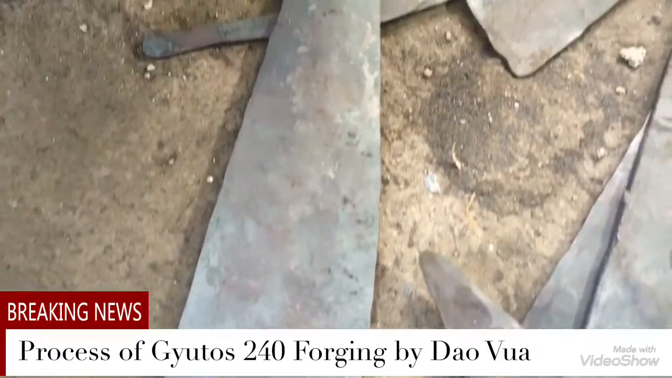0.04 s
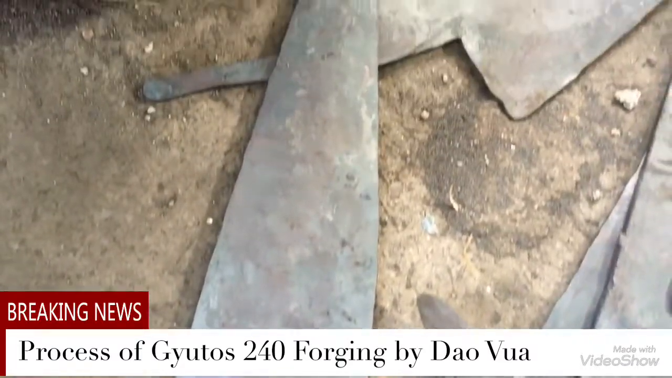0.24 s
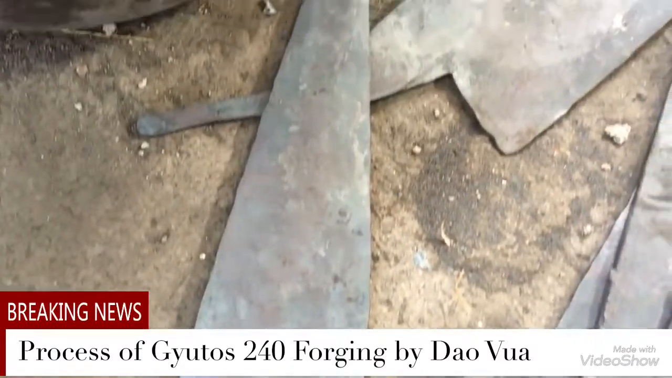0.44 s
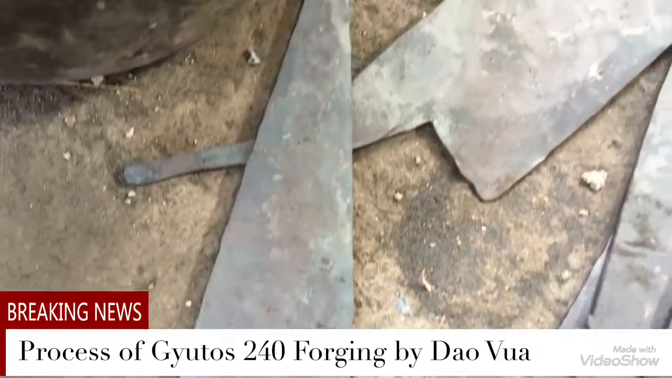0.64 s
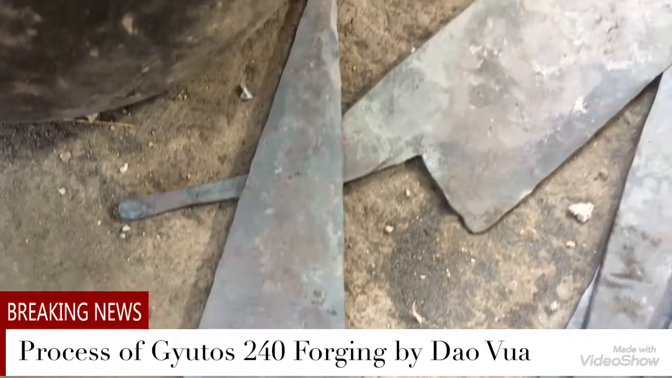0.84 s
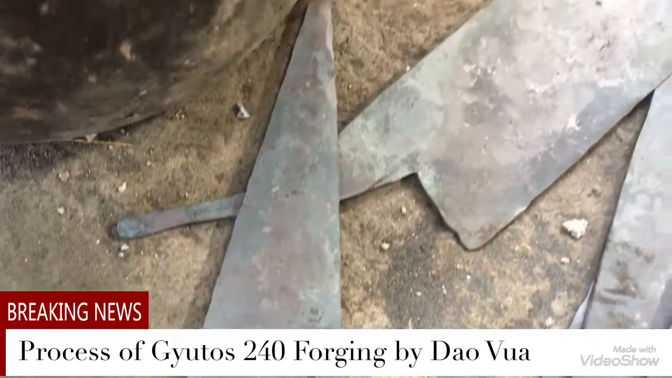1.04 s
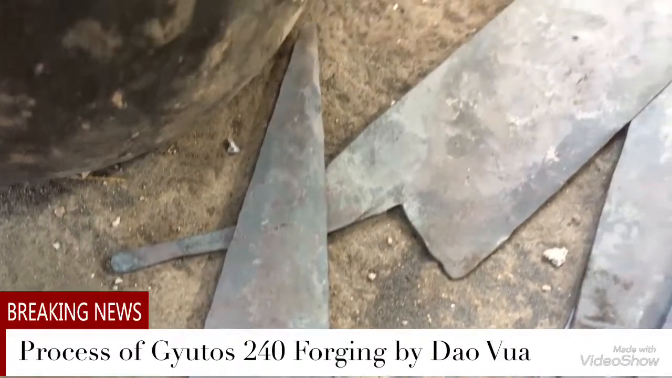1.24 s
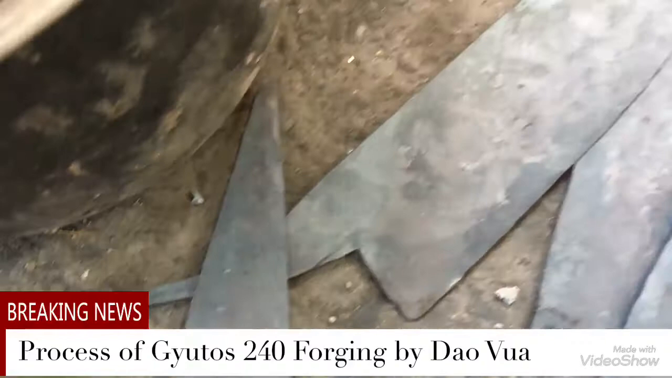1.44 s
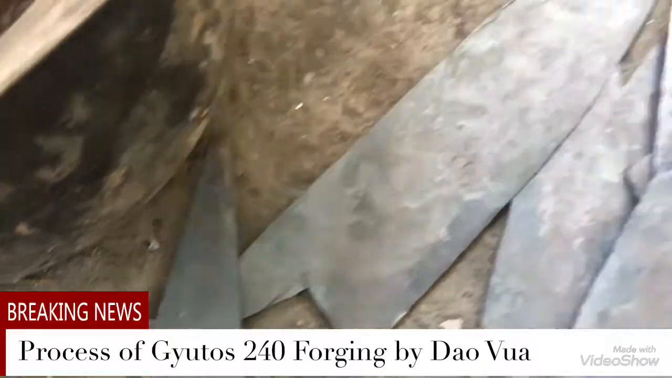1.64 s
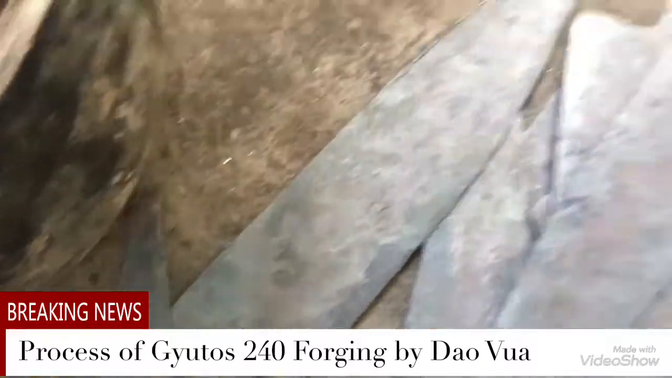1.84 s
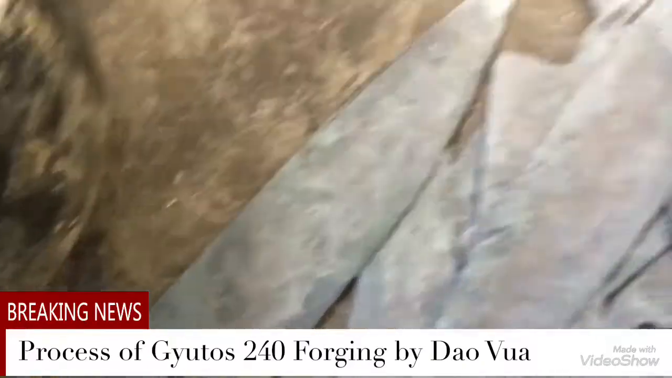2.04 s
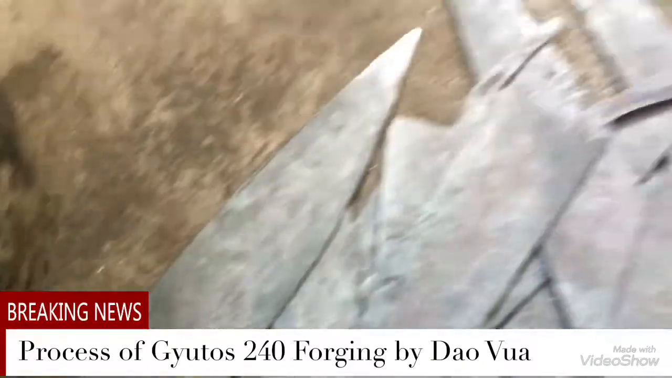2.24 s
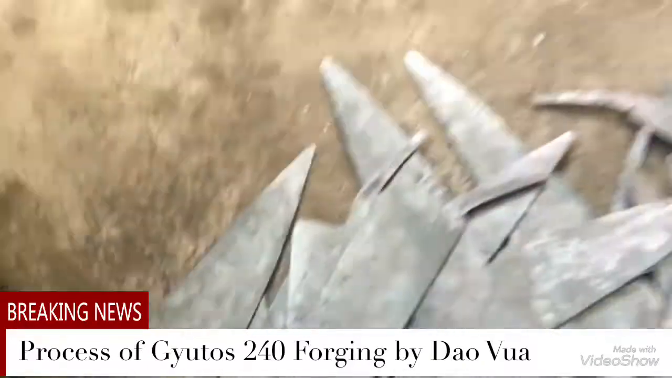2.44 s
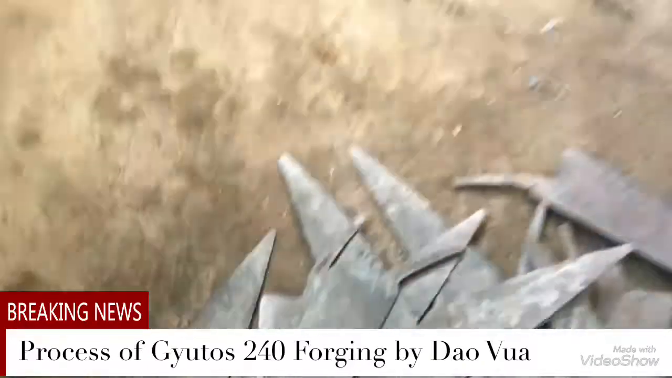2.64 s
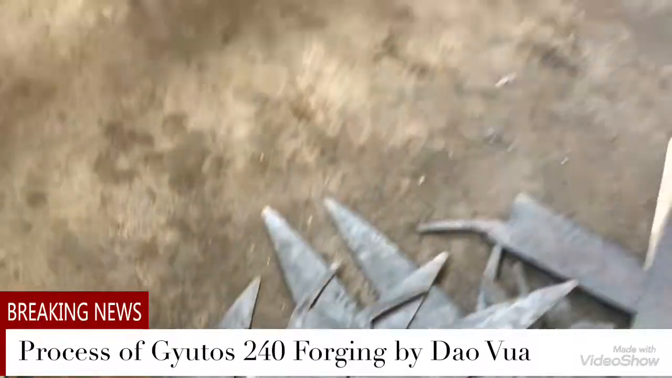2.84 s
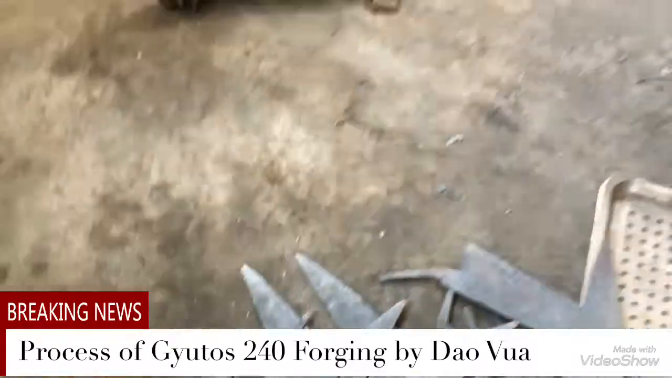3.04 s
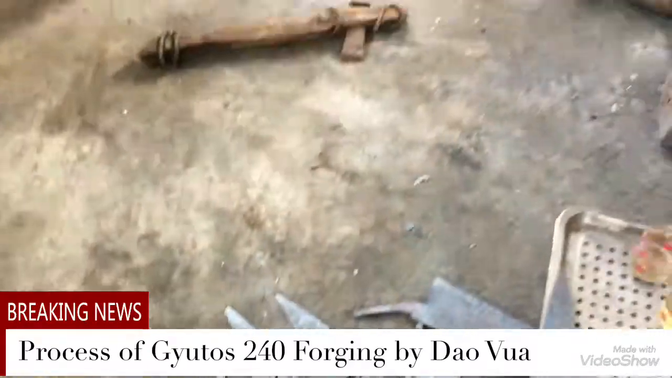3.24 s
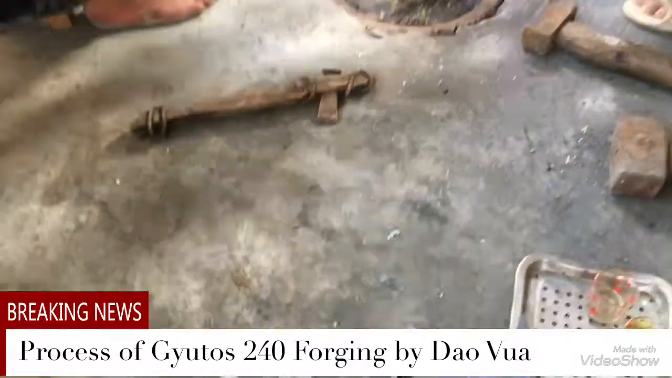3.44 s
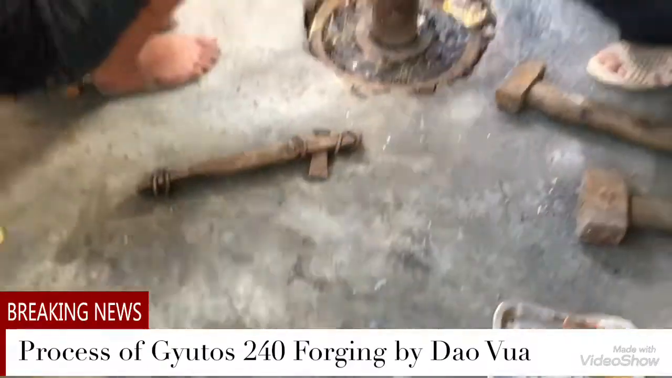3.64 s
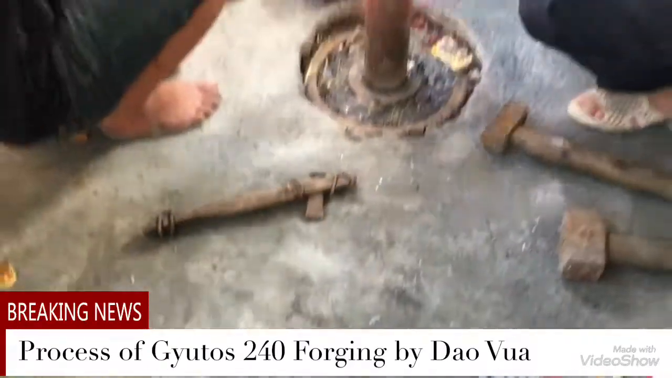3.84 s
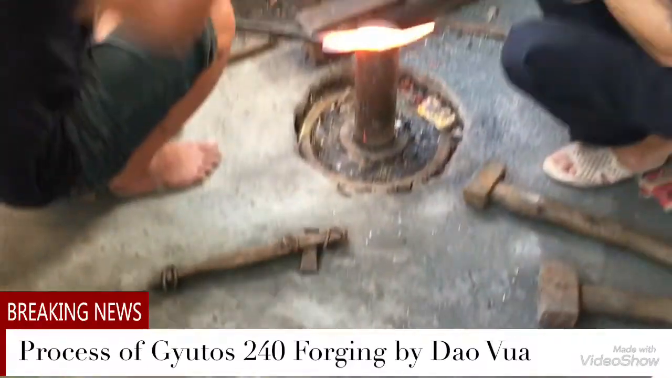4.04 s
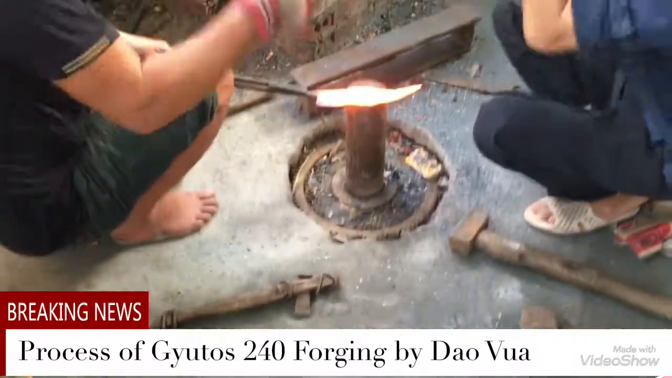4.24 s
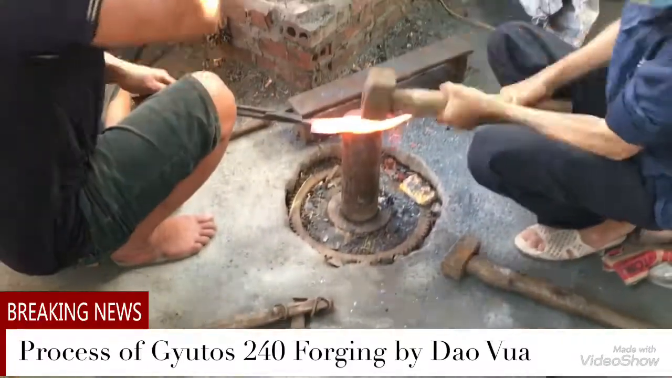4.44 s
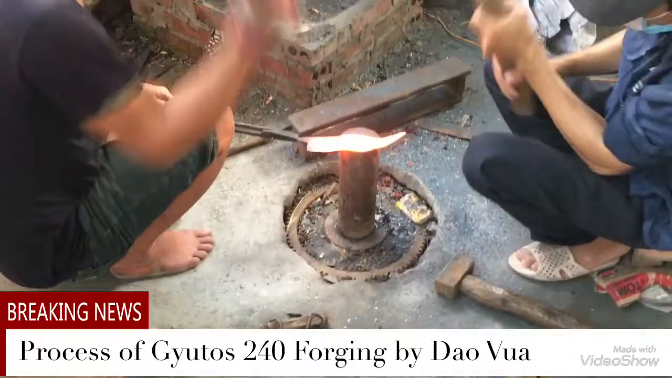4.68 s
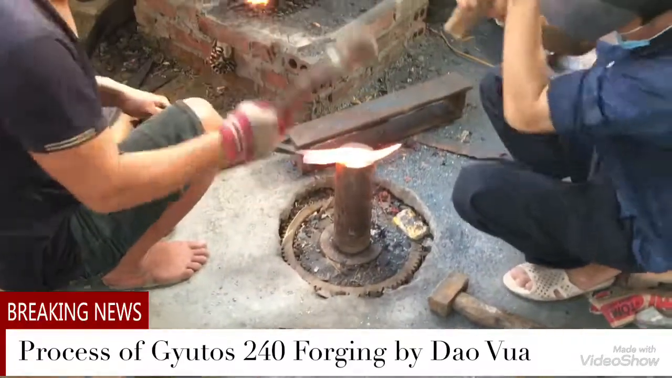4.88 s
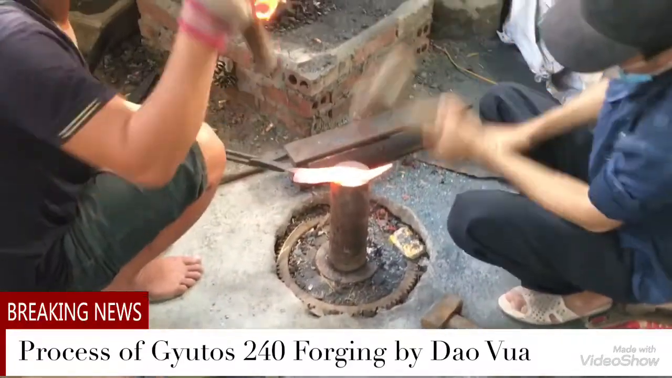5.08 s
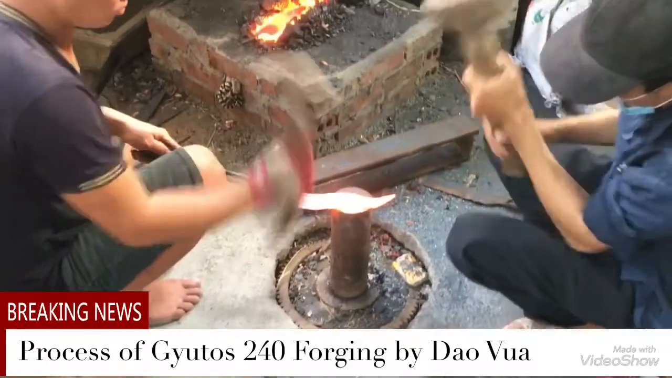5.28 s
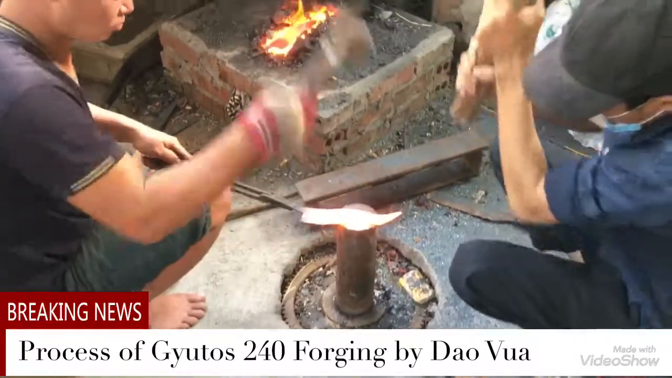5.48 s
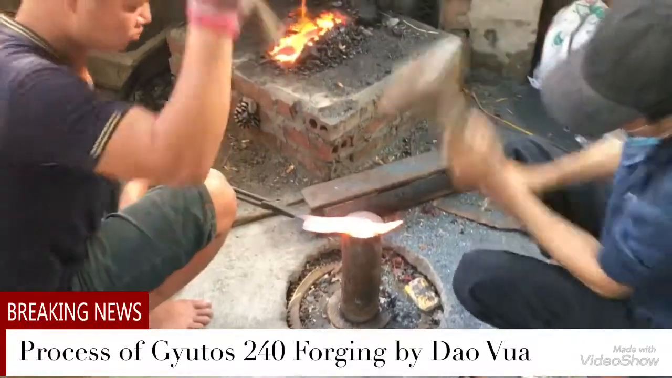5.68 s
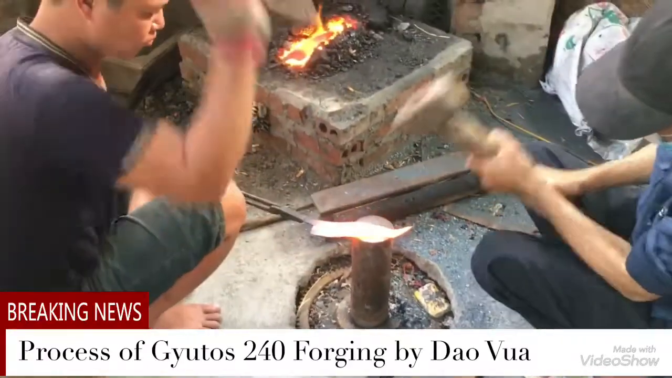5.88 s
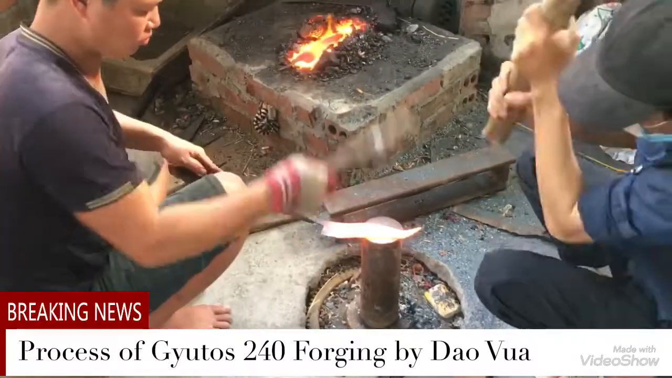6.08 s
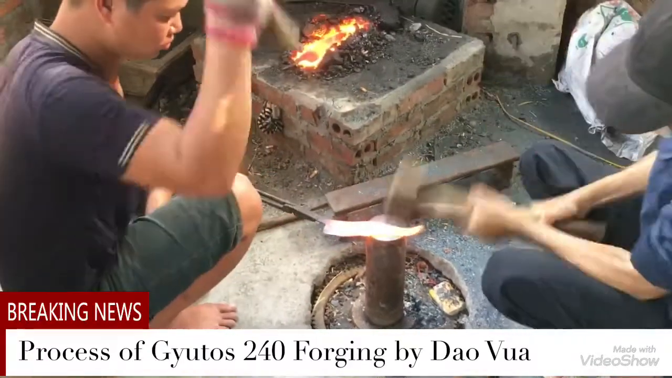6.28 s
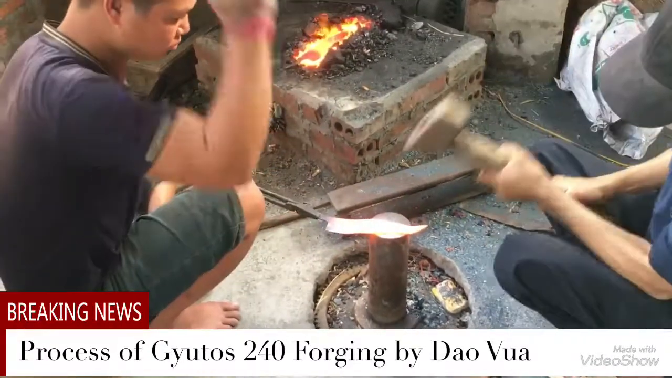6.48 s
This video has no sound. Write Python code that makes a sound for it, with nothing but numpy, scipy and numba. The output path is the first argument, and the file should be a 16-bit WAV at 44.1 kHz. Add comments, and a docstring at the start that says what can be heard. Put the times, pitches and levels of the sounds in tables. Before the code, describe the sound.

After a few soft tool knocks, a light hammer and a heavy sledge trade even, bright clanking blows on an anvil in a hard-walled forge.

```python
"""A motor hums behind soft room noise, tools knock close by, then two smiths strike a hot blade on an anvil.
Hand hammer and sledge soon alternate; each blow is a contact pulse ringing short, damped modes of steel and floor.
The hard-walled workshop answers with scattered echoes and a decaying tail. Hum is wavering sines, air is filtered
noise, bumps are sinking sines. The microphone is a phone that turns to the anvil; its limiter holds down the blows."""
import sys
import numpy as np
from scipy import signal
from scipy.fft import rfft, irfft
from scipy.io import wavfile
from scipy.ndimage import uniform_filter1d, minimum_filter1d
from numba import njit

SR = 44100
rng = np.random.default_rng(int(sys.argv[2]) if len(sys.argv) > 2 else 0)


def to_wav(sig):
    """Store sig (one row per channel, or 1-D mono) as 16-bit WAV at the path in sys.argv[1].

    Samples outside -1..1 are clipped; the rate is SR.
    """
    pcm = np.clip(np.atleast_2d(sig), -1, 1) * 32767
    pcm = np.round(pcm).astype(np.int16)
    wavfile.write(sys.argv[1], SR, pcm.T)  # frames by channels


N = 287091
TIME = np.arange(N) / SR
SIZE = 32768  # samples in one blow or knock with its echoes
AGE = np.arange(SIZE) / SR  # seconds since the contact
FREQ = np.fft.rfftfreq(SIZE, 1 / SR)
TOP_HZ = 15900  # upper edge of what the phone passes

# Soft background noise around the phone. Each row: frequency in Hz, relative density in dB per Hz.
AIR_COLOUR = [(25, -21), (60, 1), (100, -5.5), (200, -8), (330, -11), (600, -18), (1200, -12.5),
              (2200, -17), (3500, -23), (4800, -30.5), (6500, -33.5), (9000, -36.5), (11000, -42),
              (15500, -44)]
# Overtones of the motor. Each row: multiple of the hum, relative level in dB, share of the swell it follows.
HUM_OVERTONES = [(2, 1.5, 0.71), (3, -7, 0.39), (4, -6.5, 0.16), (5, -18, 0.66), (6, -9, 0)]
# Low bumps on the phone. Each row: start in seconds, settled pitch in Hz, level in dB, t60 in seconds.
PHONE_BUMPS = [(1.572, 59, -32, 0.16), (2.9245, 51, -5.5, 0.067)]
# Tools handled close by. Each row: start in seconds, dull thump in relative dB, bright clink in relative dB.
TOOL_KNOCKS = [(0.416, 4, -16.5), (.750, -7, 0.5), (.762, -26, -7), (.825, -16, -5), (1.535, -18, -23),
               (1.591, -27, -35)]
# Spectrum of the dull thump. Each row: frequency in Hz, level in dB.
THUMP_SPECTRUM = [(40, -8), (120, -0.5), (180, 11), (280, 1.5), (450, -0.5), (800, -11.5), (1300, -24),
                  (4000, -48)]
# Spectrum of the bright clink. Each row: frequency in Hz, level in dB.
CLINK_SPECTRUM = [(100, -26), (400, -22), (1100, -10.5), (2500, -15.5), (5000, -12.5), (9000, -15),
                  (15500, -28)]
# Reverberation of the workshop. Each row: band centre in Hz, t60 in seconds, level of the long tail in dB.
ROOM_BANDS = [(59.7, 0.59, -35), (149, 0.38, -27.5), (400, 0.33, -25), (930, 0.32, -24), (1780, 0.33, -23),
              (3820, 0.29, -25), (6800, 0.23, -26.5), (10500, 0.23, -30.5), (15000, 0.24, -43)]
# Modes a blow rings through the hot steel, the lowest in the floor.
# Each row: frequency in Hz, relative level in dB, t60 in seconds, dB more under the light hammer.
ANVIL_MODES = [(122.8, 6, 0.21, -9), (153, 10.5, 0.24, -9), (194, 3.5, 0.071, -3.5),
               (213.2, 8, 0.54, -10.5), (283, 3.5, 0.12, -5), (354, 6, 0.19, -9.5), (682, -5, 0.089, 0),
               (721, 4, 0.042, -33), (758, 5, 0.052, -32), (1384, -4.5, 0.022, 5.5), (1608, 7, 0.023, -25),
               (1748, 7.5, 0.019, -4), (1730, 10, 0.21, -9), (2274, 1.5, 0.037, 2.5), (2400, -6, 0.05, 3),
               (2916, 1.5, 0.015, -26), (3110, 8.5, 0.053, 7.5), (4015, -2, 0.011, -4),
               (6260, -23, 0.04, -2), (9860, -12, 0.013, -13)]
# High modes of the anvil's face.
# Each row: frequency in Hz, relative level in dB, t60 in seconds, dB more under the light hammer.
FACE_MODES = [(6990, 0, 0.028, 8.9), (7230, 4, 0.048, 2.7), (7180, -6, 0.053, 13.4)]
# The sledge's blows. Each row: start in seconds, force in dB, hardness of the contact in dB.
SLEDGE_BLOWS = [(1.9400, 0, 2.5), (2.6052, -1.5, -1), (3.2554, -4, -0.5), (3.8957, -3.5, 4.5),
                (4.5277, -2.5, 2), (5.1630, -3.5, 5), (5.7937, -2, 5), (6.4134, -3.5, 4.5)]
# The hand hammer's blows. Each row: start in seconds, force in dB, hardness of the contact in dB.
HAMMER_BLOWS = [(1.1578, -1.5, 0), (1.3892, -2, -3), (2.2592, 1.5, 1), (2.9208, -0.5, 2.5),
                (3.5564, 0.5, -0.5), (4.1948, 1, 3), (4.8251, 0.5, 2), (5.4502, 0.8, 1), (6.0794, 2.5, -3)]
# Spectrum of the sledge's contact. Each row: frequency in Hz, level in dB.
SLEDGE_CONTACT = [(25, -21), (60, 3.5), (100, -12), (135, -3), (215, -3.5), (300, 3.5), (500, -5),
                  (1000, -0.5), (1500, 2), (2500, -3.5), (4200, -5.5), (4800, -12.5), (6500, -6.5),
                  (7900, -17), (15500, -22)]
# Spectrum of the hand hammer's contact. Each row: frequency in Hz, level in dB.
HAMMER_CONTACT = [(25, -9), (60, -8.5), (100, -2.5), (160, -3), (300, -5.5), (500, -10), (1000, -0.5),
                  (2100, 3), (3500, -2), (4900, -5.5), (6400, -1.5), (7900, -7.5), (11000, -14),
                  (15500, -18)]
# What the sledge drives at middling hardness.
# One row: floor thud, ring of the anvil, ring of its face, first snap of contact, all in dB.
SLEDGE_DRIVES = (1.4, 1.07, -4.5, -2)
# What the hand hammer drives at middling hardness.
# One row: floor thud, ring of the anvil, ring of its face, first snap of contact, all in dB.
HAMMER_DRIVES = (0, -0.8, 0, -12)

SNAP_FADE_DB_PER_S = 2.5  # the snap weakens as the scale is knocked off the steel
# The phone turns to the anvil; before that the face rings weaker and the air is louder.
TURN_MIDDLE_S, TURN_LENGTH_S = 2.36, 1.0
AWAY_FACE_DB, AWAY_AIR_DB = -10, 4
AIR_DB = -52.5  # once the phone has turned
# The electric motor's hum fades as the phone is carried off, and swells once.
HUM_HZ, HUM_START_DB, HUM_FADE_DB_PER_S = 98.8, -58.5, 1.5
SWELL_START_S, SWELL_ATTACK_S, SWELL_HOLD_S, SWELL_RELEASE_S, SWELL_DB = 0.6, 0.19, 0.4, 0.3, 13.5


def undb(db):
    """Decibels to amplitude gain."""
    return 10 ** (np.asarray(db) / 20)


def along(points, hz):
    """Read (Hz, value) points on a log-frequency axis."""
    point_hz, value = np.transpose(points)
    return np.interp(np.log(hz + 1), np.log(point_hz), value)


def add(track, start_s, sound):
    """Mix a sound in at its start time."""
    first = int(start_s * SR)
    track[first:first + len(sound)] += sound[:N - first]


def walk(rate_hz):
    """Slow smoothed chance with a spread near 1."""
    step = int(SR / rate_hz)
    stairs = np.repeat(rng.standard_normal(N // step + 1), step)
    smooth = uniform_filter1d(uniform_filter1d(stairs, step), step)
    return np.sqrt(2) * smooth[:N]


def away(time_s):
    """1 while the phone faces away from the anvil, 0 once it has turned."""
    return np.clip(0.5 - (time_s - TURN_MIDDLE_S) / TURN_LENGTH_S, 0, 1)


def causal(db):
    """Minimum-phase spectrum, by folding the cepstrum: the most compact pulse with this colour."""
    cepstrum = irfft(np.log(undb(db)))
    cepstrum[1:SIZE // 2] *= 2
    cepstrum[SIZE // 2 + 1:] = 0
    return np.exp(rfft(cepstrum))


def background(flicker_db=-1.0):
    """Soft noise around the phone, in four bands that each stir on their own."""
    hz = np.fft.rfftfreq(N, 1 / SR)
    air = 0
    for low_hz, high_hz in ((0, 150), (150, 700), (700, 3000), (3000, SR)):
        colour = undb(along(AIR_COLOUR, hz)) * (hz >= low_hz) * (hz < high_hz)
        band = irfft(rfft(rng.standard_normal(N)) * colour, N)
        air = air + band * undb(flicker_db * walk(5.68))
    return air * undb(AIR_DB + AWAY_AIR_DB * away(TIME)) / np.std(air)


def motor(waver=0.0049, flicker_db=3.5):
    """A wavering hum whose overtones flicker each on their own in the room's standing waves, and swell
    together, each by its own share."""
    phase = 2 * np.pi * np.cumsum(HUM_HZ * (1 + waver * walk(20))) / SR
    corners_s = np.cumsum([SWELL_START_S, SWELL_ATTACK_S, SWELL_HOLD_S, SWELL_RELEASE_S])
    swell_db = SWELL_DB * np.interp(TIME, corners_s, [0, 1, 1, 0])
    fading_db = HUM_START_DB - HUM_FADE_DB_PER_S * TIME
    hum = 0
    for order, order_db, swell_share in HUM_OVERTONES:
        level_db = fading_db + order_db + swell_share * swell_db + flicker_db * walk(10)
        hum = hum + np.sqrt(2) * np.sin(order * phase) * undb(level_db)
    return hum


def bump(sag=3.9, sag_s=0.0035, rise_s=0.0036):
    """A few low cycles through the phone's body, sinking in pitch as the push relaxes."""
    out = np.zeros(N)
    for start_s, hz, db, t60 in PHONE_BUMPS:
        pitch_hz = hz * (1 + sag * np.exp(-AGE / sag_s))
        phase = 2 * np.pi * np.cumsum(pitch_hz) / SR
        envelope = (1 - np.exp(-AGE / rise_s)) * np.exp(-np.log(1000) * AGE / t60)
        add(out, start_s, undb(db) * np.sin(phase) * envelope)
    return out


def rustle(db=-55, low_hz=5500, grain_db=6.0, clump_db=1.2):
    """A faint gritty scuff around the first thump: high-passed noise of uneven grains that swells and fades."""
    start_s, length_s = 0.405, 0.23
    count = int(length_s * SR)
    grit_db = grain_db * rng.standard_normal(N) + clump_db * walk(300)
    grains = rng.standard_normal(N) * undb(grit_db)
    high_pass = signal.butter(2, low_hz, "high", fs=SR, output="sos")
    hiss = signal.sosfilt(high_pass, grains[:count])
    out = np.zeros(N)
    add(out, start_s, undb(db) * hiss * np.hanning(count))
    return out


def workshop(scatter, direct_db=-4.5, direct_s=0.001, late_t60=1.0, build_s=0.0052, sparse_s=0.037, sparse=0.69):
    """Room response: a direct burst, single echoes that thicken, a fast decay and a faint long tail."""
    # early on, a higher power of the noise leaves only its peaks standing out as echoes
    echoes = scatter * np.abs(scatter) ** (sparse * np.exp(-AGE / sparse_s))
    spectrum = rfft(echoes)
    tail = 0
    for hz, t60, late_db in ROOM_BANDS:
        band = along([(row[0], row[0] == hz) for row in ROOM_BANDS], FREQ)
        decay = 1000 ** (-AGE / t60) + undb(late_db) * 1000 ** (-AGE / late_t60)
        tail = tail + irfft(spectrum * band) * decay
    tail *= 1 - np.exp(-(AGE / build_s) ** 2)
    # keeping only the phase spreads the burst over milliseconds with almost no colour of its own
    spread = rng.standard_normal(SIZE) * AGE * np.exp(-AGE / direct_s)
    burst = irfft(np.exp(1j * np.angle(rfft(spread))))
    burst = burst * (AGE < 10 * direct_s)
    return rfft(tail / np.linalg.norm(tail) + undb(direct_db) * burst)


def knocks(db=10):
    """Tools handled near the phone: dull thumps and light clinks, drier than the blows."""
    out = np.zeros(N)
    thump = causal(along(THUMP_SPECTRUM, FREQ))
    clink = causal(along(CLINK_SPECTRUM, FREQ))
    for start_s, thump_db, clink_db in TOOL_KNOCKS:
        dull = undb(thump_db) * thump * workshop(rng.standard_normal(SIZE), direct_db=1)
        bright = undb(clink_db) * clink * workshop(rng.standard_normal(SIZE), direct_db=-2.5)
        add(out, start_s, irfft(dull + bright))
    return undb(db) * out


def snap(low_hz=7000):
    """The first instant of contact: a band-passed impulse, one tiny bright click of peak 1."""
    band = signal.butter(2, [low_hz, TOP_HZ], "band", fs=SR, output="sos")
    click = signal.sosfilt(band, signal.unit_impulse(SIZE))
    return click / np.abs(click).max()


def mode(hz, t60):
    """Response of one damped resonance, gain 1 at its centre; a shorter ring is a wider peak."""
    width_hz = np.log(1000) / (np.pi * t60)
    damping = 1j * FREQ * width_hz
    return damping / (hz ** 2 - FREQ ** 2 + damping)


def blow(controls, colour, light, thud_hz=400, treble_hz=4500, scatter_db=1.5, detune=0.00082,
         spot_db=0.77, spot_hz=220):
    """One blow: the crack of contact plus modes that shift a little with the spot that is struck."""
    force_db, thud_db, treble_db, ring_db, face_db = controls
    thud_tilt = thud_db / (1 + (FREQ / thud_hz) ** 2)
    treble_tilt = treble_db * FREQ ** 2 / (FREQ ** 2 + treble_hz ** 2)
    # blade, tongs and hammer head add many damped resonances that differ from blow to blow
    ripple = np.interp(FREQ / spot_hz, np.arange(SIZE), rng.standard_normal(SIZE))
    power = undb(along(colour, FREQ) + thud_tilt + treble_tilt + spot_db * ripple) ** 2
    for modes, drive_db in ((ANVIL_MODES, ring_db), (FACE_MODES, face_db)):
        for hz, db, t60, light_db in modes:
            size, shift = rng.standard_normal(2)
            driven_db = thud_db if hz < thud_hz else drive_db
            gain = undb(db + driven_db + light * light_db + scatter_db * size)
            power = power + np.abs(gain * mode(hz * (1 + detune * shift), t60)) ** 2
    return undb(force_db) * causal(10 * np.log10(power))


def smith(blows, colour, drive, light, db, ring_share, face_share, change=0.61):
    """One smith: harder contact is brighter and rings more; echoes change per blow as the phone moves."""
    out = np.zeros(N)
    scatter = rng.standard_normal(SIZE)
    click = snap()
    thud_db, ring_db, face_db, snap_db = drive
    for start_s, force_db, hard_db in blows:
        # part of the echo pattern is renewed, the rest carries over
        scatter = np.sqrt(1 - change) * scatter + np.sqrt(change) * rng.standard_normal(SIZE)
        ring_now_db = ring_db + ring_share * hard_db
        face_now_db = face_db + face_share * hard_db + AWAY_FACE_DB * away(start_s)
        controls = force_db, thud_db, hard_db, ring_now_db, face_now_db
        clang = irfft(blow(controls, colour, light) * workshop(scatter))
        snap_now_db = snap_db - SNAP_FADE_DB_PER_S * (start_s - blows[0][0])
        add(out, start_s, undb(db) * clang + undb(snap_now_db) * click)
    return out


def scene():
    """Background, handling and both smiths as they reach the phone, in one channel."""
    surroundings = background() + motor()
    handling = bump() + rustle() + knocks()
    hammer = smith(HAMMER_BLOWS, HAMMER_CONTACT, HAMMER_DRIVES, True, db=19.0, ring_share=0.079, face_share=0.25)
    sledge = smith(SLEDGE_BLOWS, SLEDGE_CONTACT, SLEDGE_DRIVES, False, db=23.5, ring_share=0.34, face_share=0.9)
    return (surroundings + handling + hammer + sledge)[None]


@njit
def follow(peak, release):
    """Envelope that jumps up at once and sinks slowly."""
    out, level = np.empty(len(peak)), 0.0
    for i in range(len(peak)):
        level = max(peak[i], level * release)
        out[i] = level
    return out


def record(dry, ceiling=0.52, release_s=0.014):
    """The phone: a linear-phase notch, a look-ahead limiter on the peaks, then a steep cut of the top."""
    notch_hz, notch_half_width_hz, notch_depth = 3100, 55, 0.85
    hz = np.fft.rfftfreq(2 * N, 1 / SR)
    notch = 1 - notch_depth / (1 + ((hz - notch_hz) / notch_half_width_hz) ** 2)
    sound = irfft(rfft(dry, 2 * N) * notch)[:, :N]
    # the highest peak within 32 samples either side lets the gain fall ahead of a blow
    peak = -minimum_filter1d(-np.abs(sound[0]), size=65)
    envelope = follow(peak, np.exp(-1 / (release_s * SR)))
    gain = uniform_filter1d(np.minimum(1, ceiling / (envelope + 1e-9)), size=65)
    top_cut = signal.ellip(10, 0.2, 70, TOP_HZ, fs=SR, output="sos")
    return signal.sosfilt(top_cut, sound * gain)


dry = scene()
out = record(dry)
to_wav(out)
```